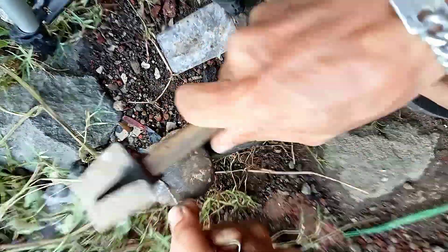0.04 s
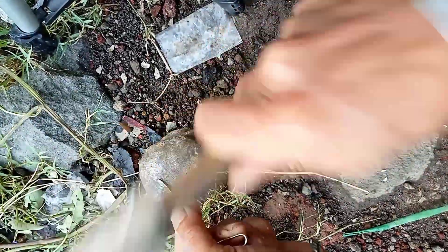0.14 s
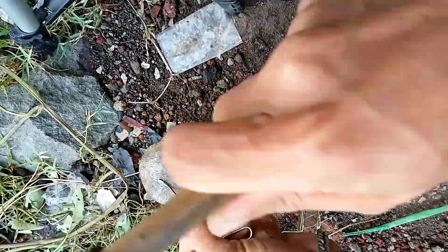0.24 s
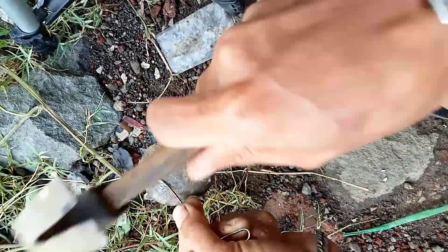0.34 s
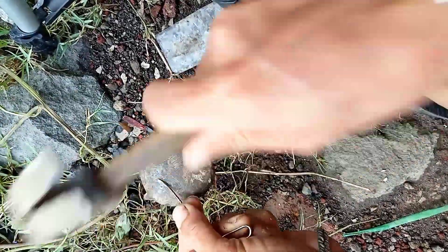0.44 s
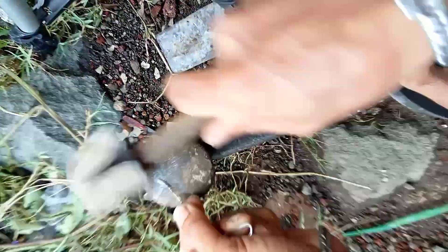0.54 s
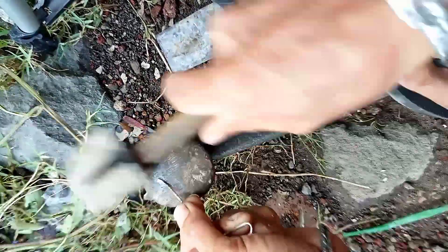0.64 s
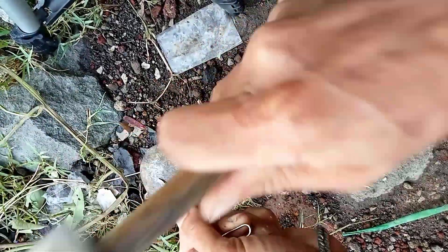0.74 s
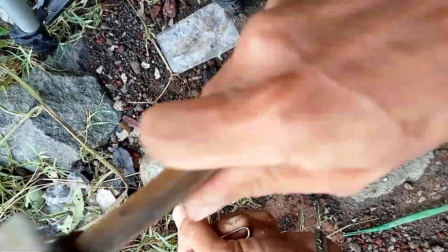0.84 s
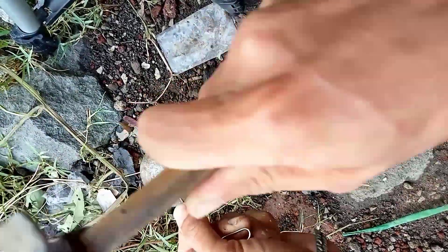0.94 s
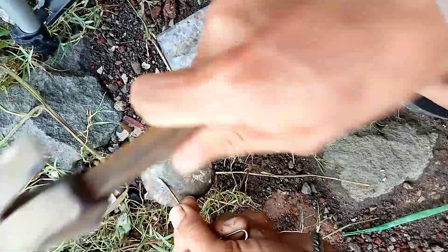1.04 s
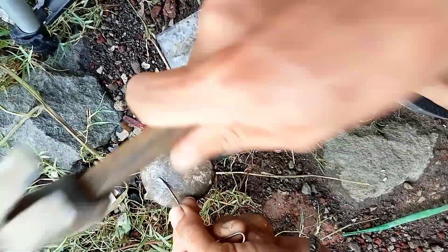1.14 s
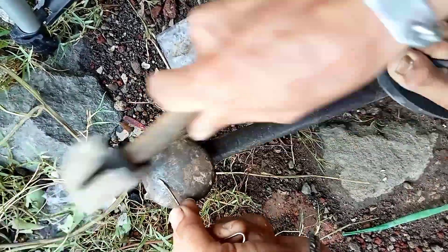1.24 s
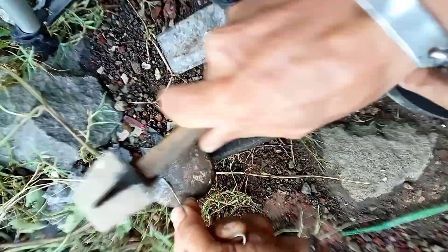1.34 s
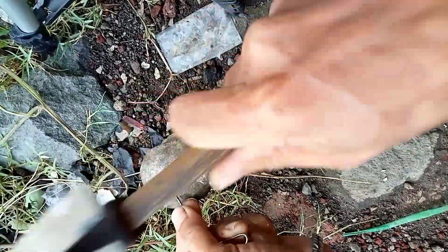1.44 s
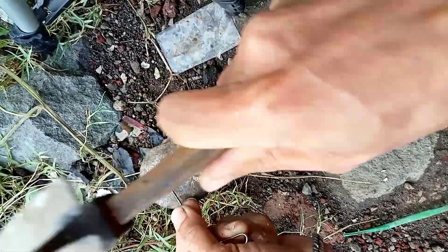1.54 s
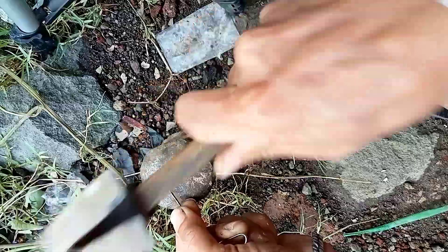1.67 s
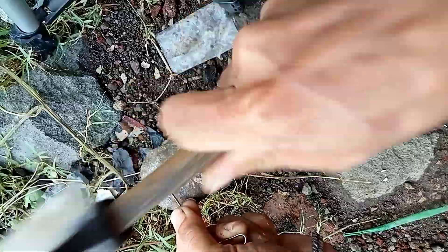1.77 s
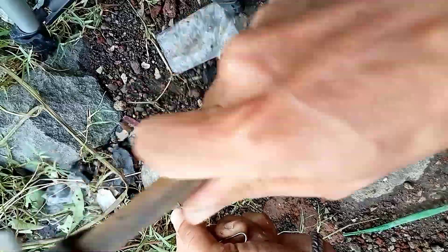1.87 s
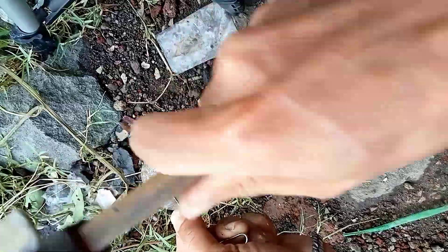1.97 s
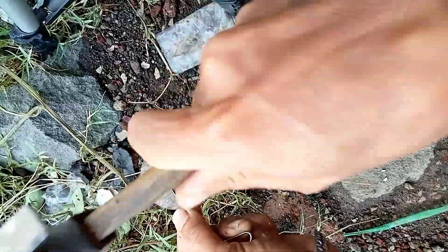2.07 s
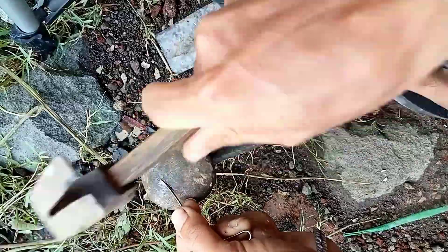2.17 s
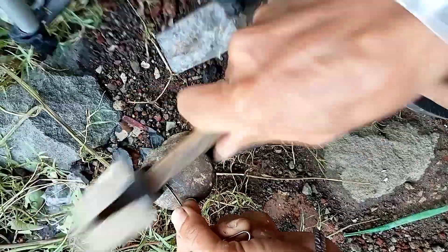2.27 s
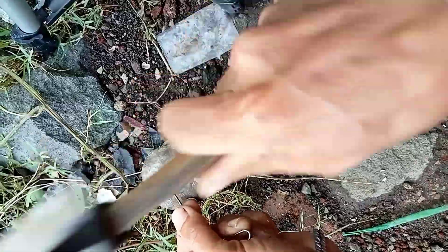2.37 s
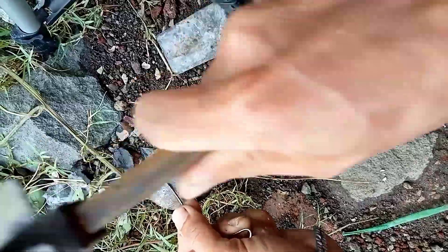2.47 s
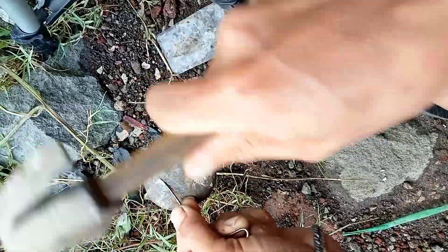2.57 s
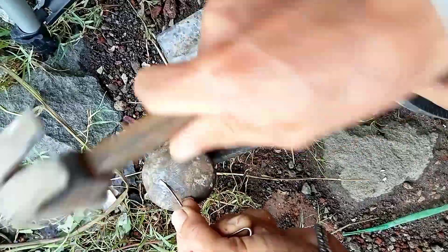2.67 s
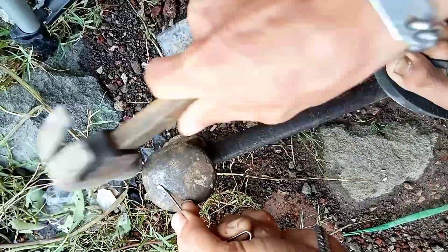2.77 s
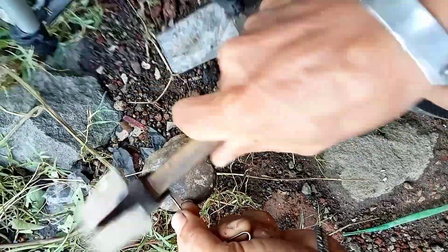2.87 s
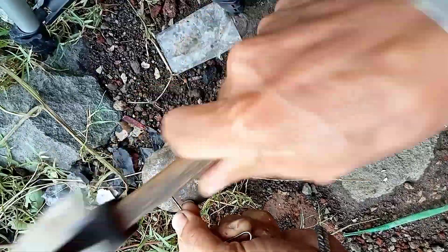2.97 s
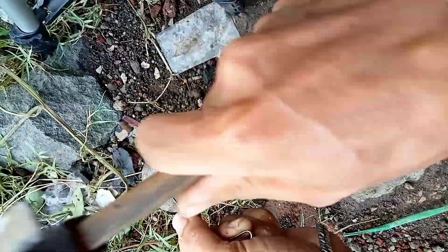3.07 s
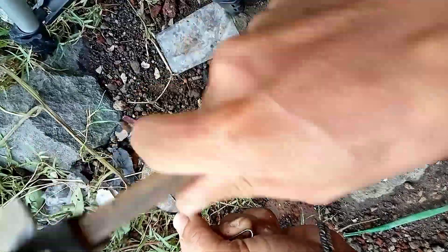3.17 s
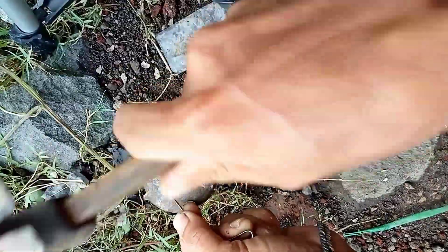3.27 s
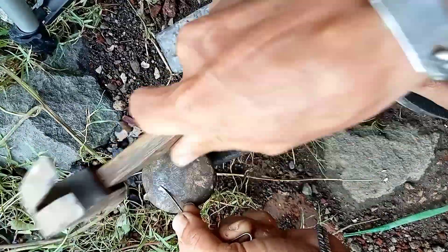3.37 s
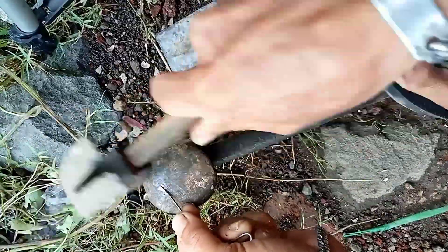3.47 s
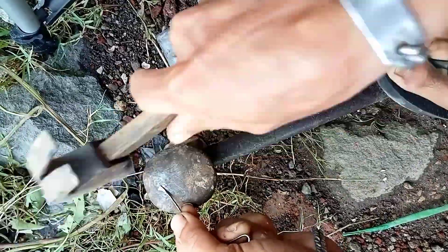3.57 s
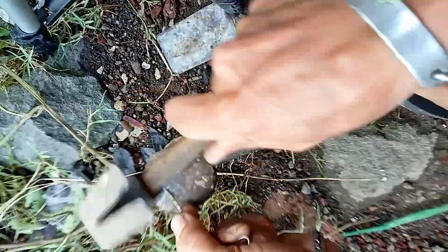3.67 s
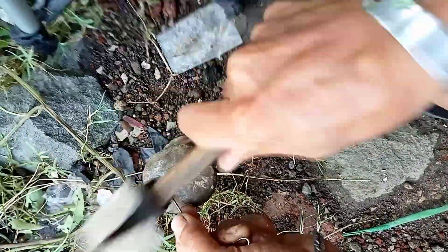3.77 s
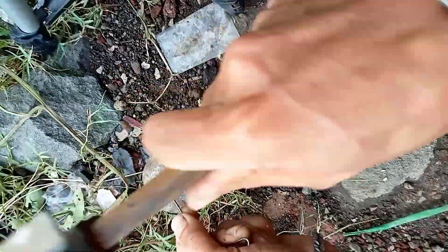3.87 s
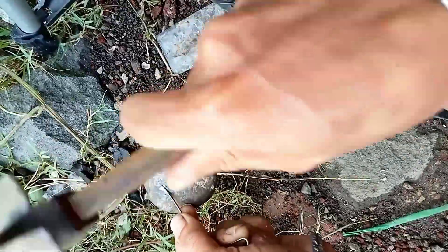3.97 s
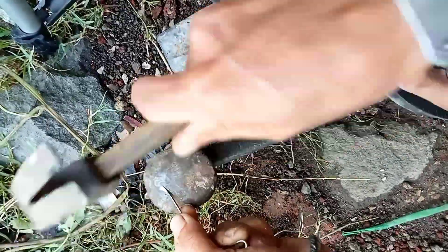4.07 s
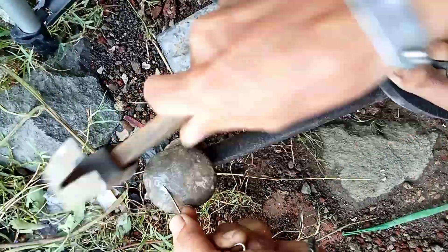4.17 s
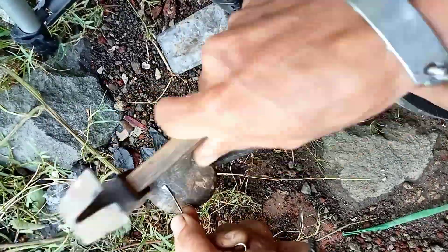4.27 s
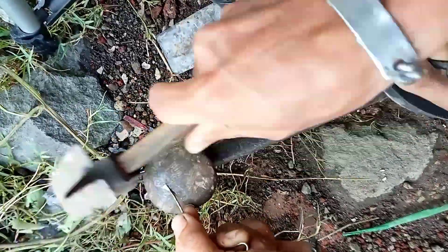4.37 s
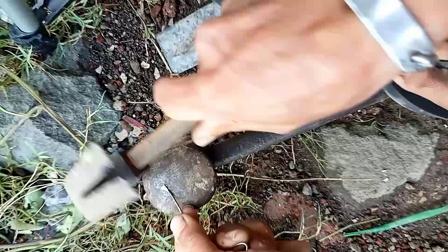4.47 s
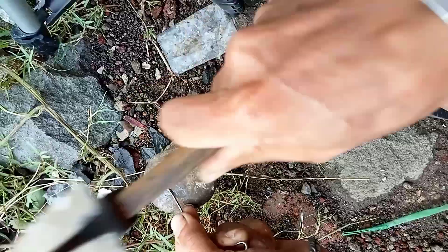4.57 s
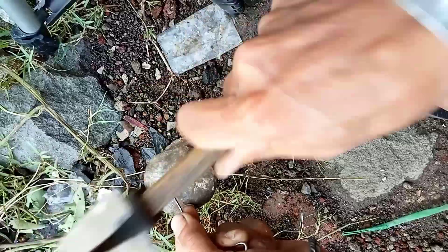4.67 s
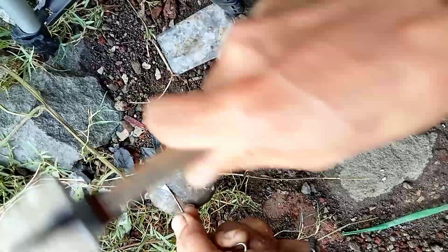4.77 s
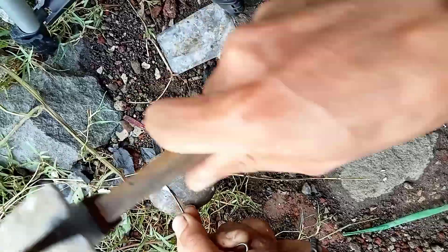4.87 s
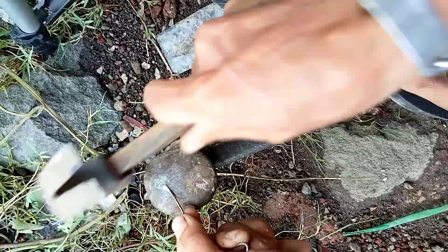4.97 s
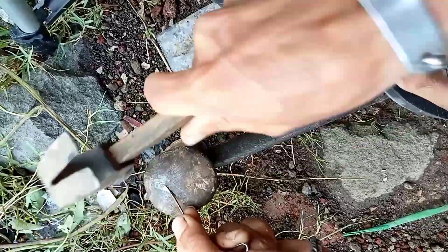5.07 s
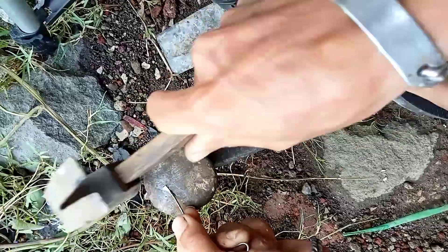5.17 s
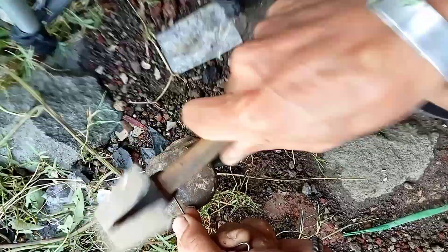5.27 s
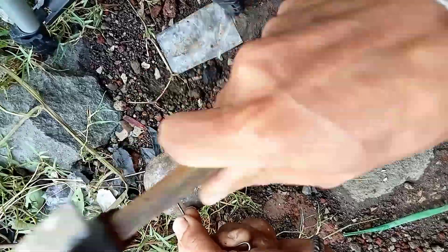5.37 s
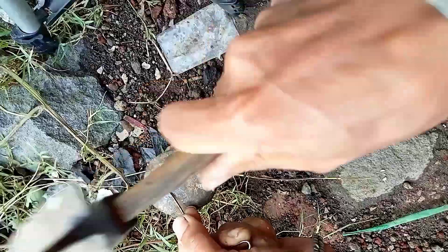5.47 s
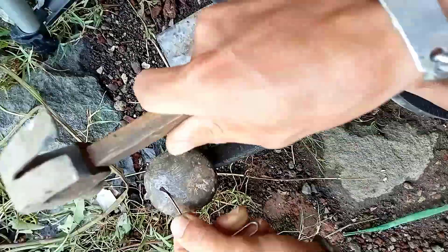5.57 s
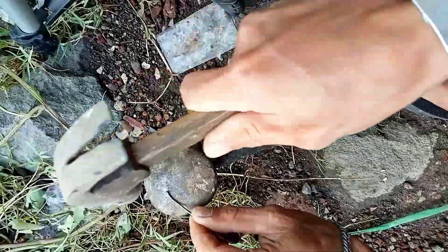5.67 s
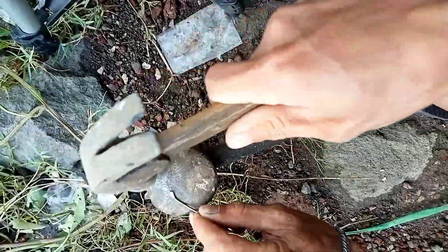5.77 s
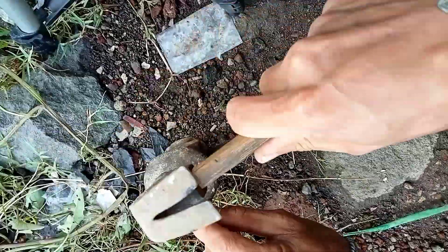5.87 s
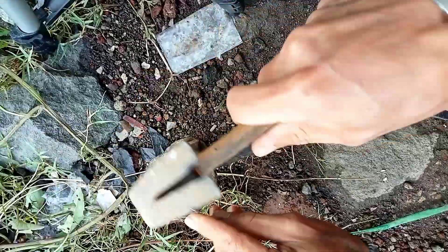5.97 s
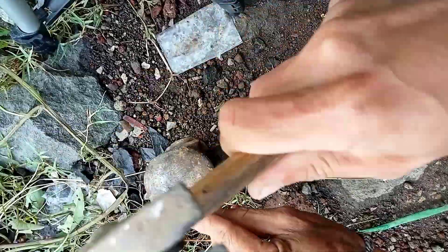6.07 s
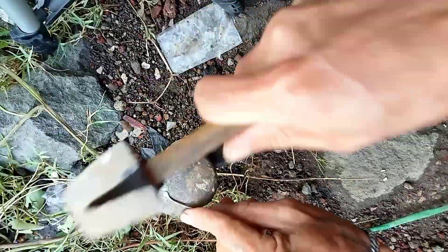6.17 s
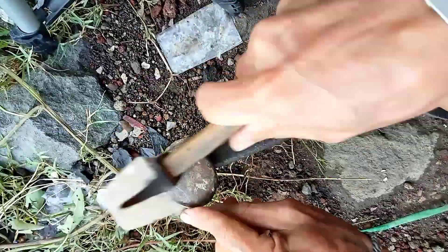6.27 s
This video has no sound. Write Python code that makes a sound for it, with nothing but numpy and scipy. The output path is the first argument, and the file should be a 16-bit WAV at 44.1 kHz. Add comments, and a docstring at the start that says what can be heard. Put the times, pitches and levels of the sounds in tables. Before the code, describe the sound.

Very close, dry outdoor hammering: a hammer flattens steel wire on a round stone at eight or nine strokes a second. Hard cracking clacks with a short metallic ring and dull stone knock alternate with groups of faint, scraping ticks. Near the end the steady rhythm stops, leaving a short gap, a few tiny touches and one last hard blow. Distant traffic rumbles softly beneath slight microphone hiss.

```python
"""Hammer on steel wire, close up outdoors

A hammer flattens a steel wire on a round stone, mostly 8-9 strokes a second, close to the microphone.
Blows are bursts of coloured noise a few ms long, with the stone's knock and its thud into the soil.
Light strokes skid along the wire as swelling noise and end in a tick; all ring the steel's damped modes.
Wire ticks and a thin high sizzle follow, the ground scatters a faint tail; far traffic rumbles under
microphone hiss. Levels of single sounds are rms over 20 ms."""
import sys
import numpy as np
from scipy import signal
from scipy.fft import rfft, irfft
from scipy.io import wavfile

SR = 44100
rng = np.random.default_rng(int(sys.argv[2]) if len(sys.argv) > 2 else 0)


def log_audio(samples):
    """Write samples as a 16-bit WAV file to the path given in sys.argv[1]."""
    # one column per channel
    frames = np.atleast_2d(samples).T
    # limit to full scale, then quantise
    limited = np.clip(frames, -1, 1)
    pcm = np.round(limited * 32767).astype(np.int16)
    wavfile.write(sys.argv[1], SR, pcm)


N = 279153

# blows on the wire, mostly hard, with a few soft ones and one faint touch:
# (time [s], contact time [s], strength [dB], knock pitch [Hz], thud pitch [Hz], thud level [dB],
# ring reference [dB])
BLOWS = [(0.0745, 0.0043, -15, 352, 219, -18.5, -23), (.191, 0.0045, -18.5, 414, 125, -28, -23),
         (.3086, 0.005, -14.5, 490, 197, -21.5, -22), (.423, 0.0053, -17, 480, 193, -26, -23),
         (0.657, 0.0064, -16, 620, 160, -33.5, -23.5), (0.7689, 0.0094, -18.5, 472, 130, -25.5, -22.5),
         (.8825, .0115, -18.5, 554, 137, -27.5, -27), (0.9915, 0.0069, -34.5, 420, 121, -35.5, -37),
         (1.1178, 0.0058, -17, 425, 110, -25, -22.5), (1.236, 0.003, -21, 468, 126, -21.5, -26.5),
         (1.3549, .0041, -17.5, 496, 188, -23.5, -26), (1.4725, 0.0025, -18, 544, 153, -30, -27),
         (1.582, 0.0086, -18, 525, 191, -20.5, -26), (2.1646, 0.0051, -18, 370, 204, -18.5, -23),
         (2.6408, 0.0069, -32.5, 560, 95.5, -31, -56), (2.772, .0035, -15, 362, 169, -29, -22.5),
         (2.8813, 0.0047, -20.5, 345, 183, -21, -25), (2.997, 0.0043, -23.5, 430, 145, -25.5, -23),
         (3.109, 0.0094, -25, 320, 129, -22, -28.5), (3.223, 0.011, -25.5, 540, 144, -29, -23),
         (3.3451, 0.0096, -21, 585, 120, -38, -22), (3.4607, .0066, -23.5, 530, 120, -32.5, -24),
         (3.5709, 0.013, -28.5, 580, 130, -38, -24), (3.793, .007, -20, 533, 125, -31, -33),
         (3.9037, 0.0035, -21, 484, 125, -33.5, -25.5), (4.0216, 0.0083, -16.5, 586, 152, -27, -27.5),
         (4.141, 0.004, -16.5, 518, 200, -50, -26.5), (4.2502, 0.0045, -19.5, 405, 115, -26, -32),
         (4.3652, 0.0063, -21.5, 444, 170, -36.5, -30), (4.4784, 0.0066, -27, 506, 181, -40, -31.5),
         (4.6048, 0.0053, -15.5, 432, 196, -37, -27.5), (5.5075, 0.0049, -20, 533, 146, -22.5, -23),
         (5.8529, 0.0035, -48, 460, 140, -41, -72), (6.2555, 0.002, -15.5, 570, 118, -25.5, -25.5)]
# light strokes that skid along the wire and end in a tap:
# (time [s], skid length [s], rub strength [dB], ring reference [dB], tap level [dB])
STROKES = [(0.539, 0.026, -46, -54, -46.5), (1.001, 0.012, -44, -35, -33), (1.684, .025, -36.5, -31.5, -30),
           (1.802, .017, -38.5, -34.5, -32), (1.919, .014, -38, -35.5, -32),
           (2.039, 0.016, -36.5, -30, -29.5), (2.293, 0.0081, -39, -37, -25),
           (2.403, 0.017, -38, -35, -27.5), (2.525, 0.0084, -41.5, -39, -40), (2.637, 0.015, -55, -32, -44),
           (3.682, .0198, -39.5, -35.5, -36.5), (4.707, 0.014, -40, -40.5, -39.5),
           (4.823, .016, -50, -37, -29), (4.936, 0.019, -34, -34, -33), (5.054, 0.016, -54, -37.5, -28.5),
           (5.173, 0.01, -34.5, -37.5, -42.5), (5.286, 0.016, -35, -38, -32), (5.403, .0078, -39, -42, -24),
           (6.06, .02, -79, -73, -76), (6.123, 0.017, -55, -46, -28.5)]
# steel modes, two with a faint lingering twin:
# (frequency [Hz], free 60 dB decay [s], level re the ring at that pitch [dB])
STEEL_MODES = [(4680, 0.054, -26), (4622, 0.049, 0), (4650, 0.21, -28), (4810, 0.067, -16.5),
               (5575, 0.044, -13.5), (5938, 0.057, -1.5), (10440, .034, 2.5), (11498, 0.05, 0.5),
               (11512, 0.15, -23), (13300, 0.022, -19.5)]
# pitches that stand for the low, middle, shimmer and high steel modes: (frequency [Hz])
RING_HZ = [4620, 5948, 10415, 11505]
# short modes of wire and stone: (frequency [Hz], 60 dB decay [s], relative level [dB])
PING_MODES = [(1332, 0.024, -10.5), (6700, 0.04, -2.5), (6960, 0.031, -12.5), (7145, 0.025, -10)]
# colour of a blow's crack: (frequency [Hz], relative level [dB])
CRACK_COLOUR = [(500, -18.5), (900, -2), (1250, 1.5), (1800, -2), (2300, 1), (3300, -3), (4200, -12.5),
                (5200, -43), (6800, -23), (8500, -55), (15000, -39.5)]
# colour of splintering and rubbing treble: (frequency [Hz], relative level [dB])
SPLINTER_COLOUR = [(3000, -55), (5500, -9.5), (7200, 8.5), (8500, 4.5), (12500, 3), (15000, 6)]
# colour of the stone's knock: (multiple of its pitch [1], relative level [dB])
KNOCK_COLOUR = [(.25, -26.5), (.5, -3), (1, -3), (1.6, -3), (2.599, -22.5), (6, -56)]
# colour of light contacts: (frequency [Hz], relative level [dB])
TICK_COLOUR = [(500, -19.5), (1000, -12), (1250, 5), (1600, 1), (1800, -4), (2100, -1.5), (2500, -10.5),
               (3300, -2.5), (4200, -6.5), (5200, -33), (7300, -9), (8600, -25), (12000, -26.5),
               (15000, -23)]
# colour of the thin sizzle: (frequency [Hz], relative level [dB])
SIZZLE_COLOUR = [(6000, -15.5), (9500, 4.5), (12300, -19), (14500, 3)]
# colour of the background, traffic rumble below, microphone hiss above:
# (frequency [Hz], relative level [dB])
BACKGROUND_COLOUR = [(25, -8), (45, -7), (70, -1), (115, 0), (170, -3), (250, -15), (450, -15), (750, -23),
                     (3500, -32), (5300, -47), (7400, -39), (8200, -48), (9000, -38), (10400, -53),
                     (12500, -56), (15000, -53)]
# swell of the traffic about its mean: (time [s], rumble level [dB], tyre level [dB])
TRAFFIC_SWELL = [(0.0, -53.5, -58), (0.49, -48, -59), (1.04, -52, -63), (1.9, -48.5, -60.5),
                 (4.53, -44, -56.5), (4.76, -47, -53.5), (5.41, -48.5, -54), (6.33, -49.5, -60)]
# where the face meets the wire: (time [s], offset from the usual spot [about -1 to 1])
PLACE = [(0, 0.012), (1.36, 0.44), (1.46, -1.2), (1.93, -.9), (2.03, -0.11), (3.69, 0), (3.78, 0.55),
         (6.33, 0.94)]
# change of the low, middle, shimmer and high modes at an offset of 1: (level change [dB])
PLACE_DB = [-4, -1.5, 9.5, 4]

SPAN = 4096  # samples in one single sound
AGE = np.arange(SPAN) / SR  # s since its start
GROUND_T60_S = 0.053
TOP_HZ = 15500
# against a typical blow, a harder one is duller: treble and knock grow by less than 1 dB per dB
TYPICAL_DB, TREBLE_GROWTH, KNOCK_GROWTH = -20, 0.68, 0.84
# the hammer drops back once after a blow, more softly the more the blow has spent in the wire
REBOUND_S, REBOUND_DB, REBOUND_LOSS = 0.0165, -47.5, 1  # s, dB, dB per dB
# after a light tap it bounces sooner
BOUNCE_S, BOUNCE_DB = 0.0062, -10  # s, dB re the tap
# a tap reaches the stone only when firm: its knock equals its tick at FIRM_DB and falls faster below
FIRM_DB, TAP_KNOCK_GROWTH = -15.5, 1.77  # dB, dB per dB


def undb(db):
    """Decibels to gain."""
    return 10 ** (np.asarray(db) / 20)


def level(x, db):
    """Scale one sound to an rms level, its whole energy counted over 20 ms."""
    return x * undb(db) * np.sqrt(0.02 * SR / np.sum(x ** 2))


def shape(points, size):
    """Log gain of (Hz, dB) points on the bins of a transform, joined along log frequency."""
    hz, db = np.transpose(points)
    bins_hz = np.fft.rfftfreq(size, 1 / SR)
    return np.log(undb(np.interp(np.log(bins_hz + 1), np.log(hz), db)))


def colour(x, points):
    """Causal minimum-phase filter through (Hz, dB) points, by folding the cepstrum forward in time."""
    cepstrum = irfft(shape(points, size=SPAN))
    cepstrum[1:SPAN // 2] *= 2
    cepstrum[SPAN // 2 + 1:] = 0
    return irfft(rfft(x) * np.exp(rfft(cepstrum)))


def add(track, s, x):
    """Mix a sound in at a time."""
    start = max(int(s * SR), 0)
    track[start:start + SPAN] += x[:max(N - start, 0)]


def background(background_db=-46, tyre_db=-2, waver_db=2.0):
    """Far engines rumble and waver, far tyres swell, and an even microphone hiss lies above them."""
    s, rumble, tyres = np.transpose(TRAFFIC_SWELL)
    t, hz = np.arange(N) / SR, np.fft.rfftfreq(N, 1 / SR)
    noise = rfft(rng.standard_normal(N)) * np.exp(shape(BACKGROUND_COLOUR, size=N))
    noise *= undb(background_db) / irfft(noise, N).std()
    waver = waver_db * np.interp(t, np.linspace(0, t[-1], num=70), rng.standard_normal(size=70))
    low = 1 / (1 + (hz / 250) ** 4)
    high = 1 - 1 / (1 + (hz / 1000) ** 4)
    engines = irfft(noise * low, N) * undb(np.interp(t, s, rumble - rumble.mean()) + waver)
    road = irfft(noise * (1 - low - high), N) * undb(tyre_db + np.interp(t, s, tyres - tyres.mean()))
    hiss = irfft(noise * high, N)
    return engines + road + hiss


def grit(envelope, spread_db):
    """Force of many tiny fractures under an envelope, their size redrawn every 16 samples."""
    size = np.repeat(rng.standard_normal(SPAN // 16), 16)
    return envelope * rng.standard_normal(SPAN) * undb(spread_db * size)


def contact(length, release, sag_db=0):
    """Pressure that sags (or builds, if negative) while the faces touch and dies away as they part."""
    length = max(length, 0.001)
    pressure = undb(-sag_db * np.minimum(AGE / length, 1))
    return pressure * np.exp(-np.maximum(AGE - length, 0) / release)


def stone(force, hz, db):
    """A broad, dead knock around one pitch."""
    return level(colour(force, np.array(KNOCK_COLOUR) * [hz, 1]), db)


def thud(hz, rise=0.0052, decay=0.0021):
    """The stone sinks into the soil and springs back: a sine that swells and dies in a few ms."""
    swing = np.sin(2 * np.pi * hz * AGE) * rng.choice([-1, 1])
    return swing * (1 - np.exp(-(AGE / rise) ** 2)) * np.exp(-AGE / decay)


def ring(force, modes, free=1, detune=0.001):
    """Damped modes driven by a force; the grip shifts them, a resting contact (free < 1) shortens them."""
    out = 0
    for hz, t60, db in modes:
        shifted_hz = hz * (1 + detune * rng.standard_normal())
        decay = np.exp(-np.log(1000) * AGE / (t60 * free))
        mode = np.sin(2 * np.pi * shifted_hz * AGE) * decay
        out = out + level(signal.fftconvolve(force, mode)[:SPAN], db)
    return out


def spot(s, scatter_db=1.66):
    """Where the face lands colours the four groups of steel modes; it is never twice quite the same."""
    offset = np.interp(s, *np.transpose(PLACE))
    return offset * np.array(PLACE_DB) + scatter_db * rng.standard_normal(size=4)


def steel(force, ring_db, free=1):
    """Ring the steel modes, with levels set for the low, middle, shimmer and high groups."""
    modes = [(hz, t60, db + np.interp(hz, RING_HZ, ring_db)) for hz, t60, db in STEEL_MODES]
    return ring(force, modes, free)


def blows(crack_db=0.5, splinter_db=-32.5, knock_db=-22.5, middle_db=-9.5, shimmer_db=-17.5,
          high_db=-15, ping_db=-15, first_touch=0.27):
    """The hammer presses the wire on the stone: crack, splintering treble, knock, thud and ring."""
    out = np.zeros(N)
    for s, length, strength, knock_hz, thud_hz, thud_db, ringing in BLOWS:
        harder = strength - TYPICAL_DB
        snap = first_touch * np.exp(-AGE / 0.00046)  # the faces meet with a spike of force
        force = grit(snap + contact(length, release=0.0024, sag_db=5.5), spread_db=0.0)
        splinters = grit(snap + contact(length, release=0.0033, sag_db=-2.0), spread_db=4.5)
        weight = grit(contact(length, release=0.0015, sag_db=1.0), spread_db=2.5)  # reaches the stone
        sound = level(colour(force, CRACK_COLOUR), strength + crack_db)
        sound += level(colour(splinters, SPLINTER_COLOUR), splinter_db + TREBLE_GROWTH * harder)
        sound += stone(weight, knock_hz, knock_db + KNOCK_GROWTH * harder)
        sound += level(thud(thud_hz), thud_db)
        # the high modes follow the strength of the blow
        rings = spot(s) + [ringing, ringing + middle_db, ringing + shimmer_db, strength + high_db]
        sound += steel(splinters, rings, free=0.97)
        sound += undb(strength + ping_db) * ring(force, PING_MODES)
        add(out, s, sound)
    return out


def ground(x, wet_db=-31):
    """Rocks and plants scatter a faint, short tail, from 8 ms on."""
    age = np.arange(2 * SPAN) / SR
    tail = rng.standard_normal(2 * SPAN) * np.exp(-np.log(1000) * age / GROUND_T60_S)
    tail[:int(0.008 * SR)] = 0
    return undb(wet_db) * signal.fftconvolve(x, tail / np.linalg.norm(tail))[:N]


def chatter(after_blow_db=-22, after_skid_db=-3, delay_s=0.0063, spread_s=0.012):
    """As the hammer lifts, the loose wire ticks twice more on the stone, the later the fainter."""
    out = np.zeros(N)
    for table, gain_db in (BLOWS, after_blow_db), (STROKES, after_skid_db):
        for s, length, db, *_ in table:
            for late in rng.random(size=2):
                force = grit(np.exp(-AGE / 0.0013), spread_db=2.5)
                tick = level(colour(force, TICK_COLOUR), db + gain_db - 8 * late)
                add(out, s + length + delay_s + spread_s * late, tick)
    return out


def sizzles(start_s=0.012, decay=0.014, sizzle_db=-55, spread_db=4):
    """A thin, faint high sizzle of uneven noise follows each stroke, weaker after the faintest touches."""
    out = np.zeros(N)
    for s, _, db, *_ in BLOWS + STROKES:
        envelope = np.exp(-AGE / decay) * (1 - np.exp(-AGE / 0.0085))
        sizzle = colour(grit(envelope, spread_db=spread_db), SIZZLE_COLOUR)
        add(out, s + start_s, level(sizzle, min(sizzle_db, db - 13) + 3 * rng.standard_normal()))
    return out


def tap(s, db, knock_hz=580, ring_db=(-8, -18, -23, -15), ping_db=-10.5):
    """The face just meets the wire: a sharp tick, a slight knock and a short ring."""
    force = grit(np.exp(-AGE / 0.0006) + 0.55 * np.exp(-AGE / 0.004), spread_db=1)
    sound = level(colour(force, TICK_COLOUR), db)
    sound += stone(force, knock_hz, FIRM_DB + TAP_KNOCK_GROWTH * (db - FIRM_DB))
    sound += steel(force, db + np.array(ring_db) + spot(s), free=0.65)
    return sound + undb(db + ping_db) * ring(force, PING_MODES)


def taps(jitter_s=0.0011):
    """Each blow rebounds once; each skid ends in a tap and a smaller bounce."""
    out = np.zeros(N)
    for s, length, strength, *_ in BLOWS:
        rebound = min(strength, REBOUND_DB - REBOUND_LOSS * (strength - TYPICAL_DB))
        add(out, s + length + REBOUND_S + jitter_s * rng.standard_normal(), tap(s, rebound))
    for s, length, *_, db in STROKES:
        add(out, s + length, tap(s, db))
        add(out, s + length + BOUNCE_S + jitter_s * rng.standard_normal(), tap(s, db + BOUNCE_DB))
    return out


def skids(grit_db=1, hiss_db=-11, ring_db=(-1, 0, -24, -5), ping_db=-8, overrun_s=0.0035):
    """Steel rubs on steel until just after the tap, and the rubbing force drives the ring."""
    out = np.zeros(N)
    for s, length, rub, ringing, _ in STROKES:
        swell = 1 - np.exp(-AGE / 0.0073)
        force = grit(contact(length + overrun_s, release=0.0038, sag_db=2.0) * swell, spread_db=5)
        sound = level(colour(force, TICK_COLOUR), rub + grit_db)
        sound += level(colour(force, SPLINTER_COLOUR), rub + hiss_db)
        sound += steel(force, ringing + np.array(ring_db) + spot(s), free=0.93)
        sound += undb(rub + ping_db) * ring(force, PING_MODES)
        add(out, s, sound)
    return out


def scene():
    """The hammer work close by, its faint scattered tail and the background."""
    work = blows() + taps() + skids() + chatter() + sizzles()
    return (work + ground(work) + background())[None]


def record(dry, ceiling=0.64, low_cut_hz=48):
    """The microphone drops the deep bass and rounds the loudest peaks; the top is cut."""
    thin = signal.sosfilt(signal.butter(2, low_cut_hz, "high", fs=SR, output="sos"), dry)
    rounded = thin / (1 + (thin / ceiling) ** 4) ** (1 / 4)
    return signal.sosfilt(signal.ellip(8, 0.2, 70, TOP_HZ, fs=SR, output="sos"), rounded)


dry = scene()
out = record(dry)
log_audio(out)
```